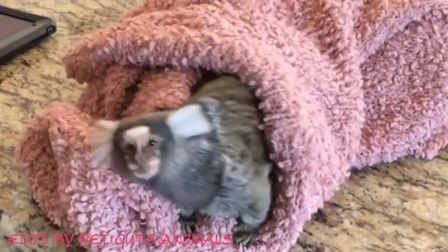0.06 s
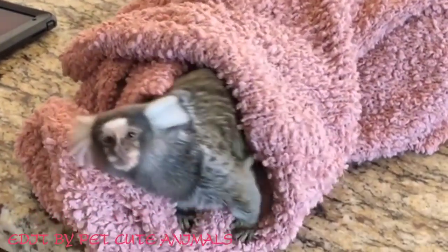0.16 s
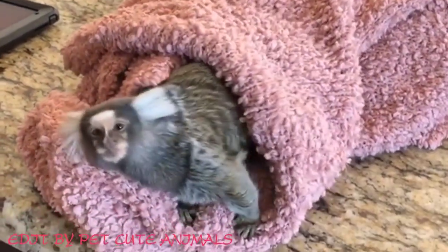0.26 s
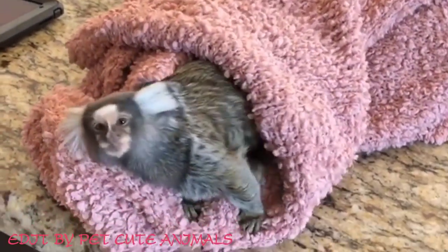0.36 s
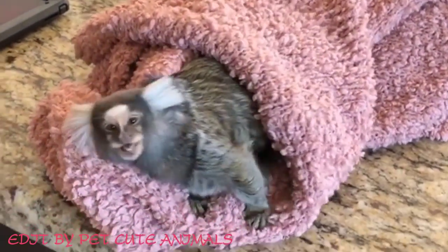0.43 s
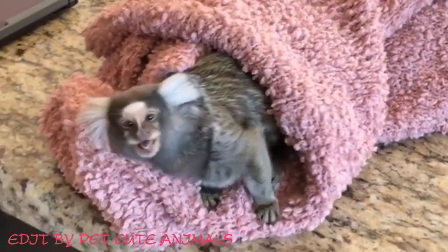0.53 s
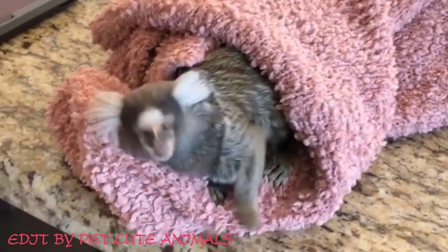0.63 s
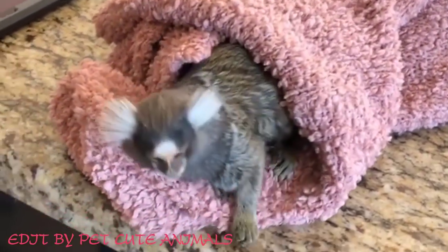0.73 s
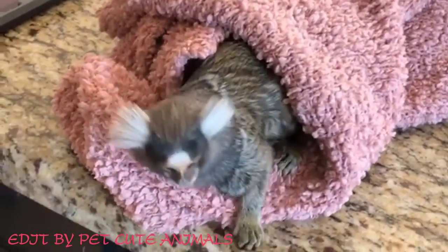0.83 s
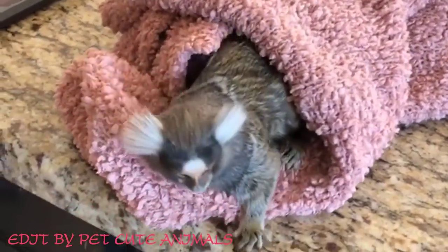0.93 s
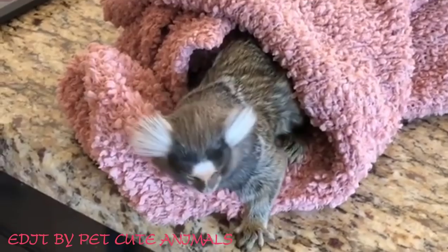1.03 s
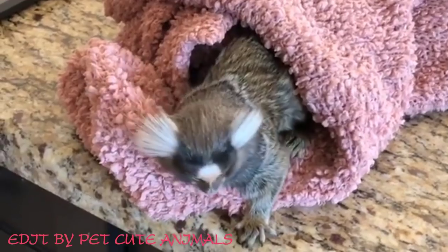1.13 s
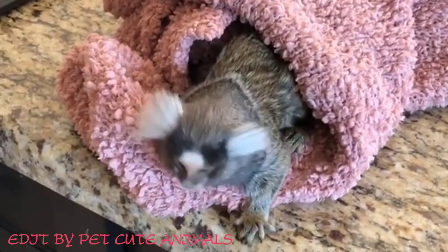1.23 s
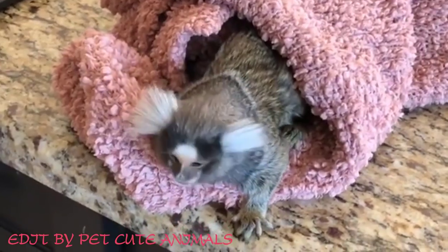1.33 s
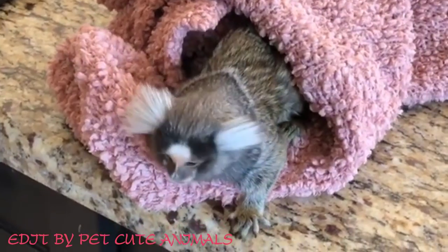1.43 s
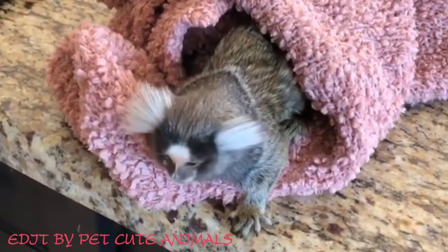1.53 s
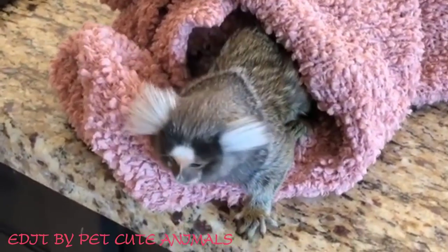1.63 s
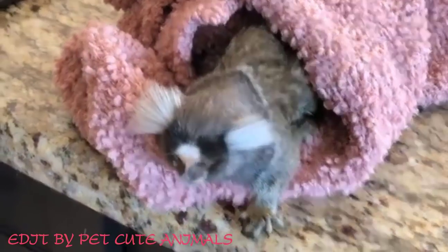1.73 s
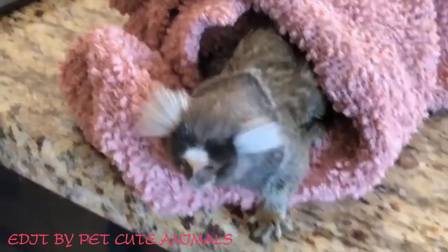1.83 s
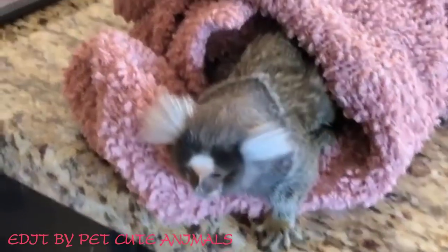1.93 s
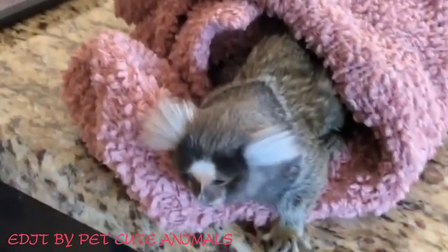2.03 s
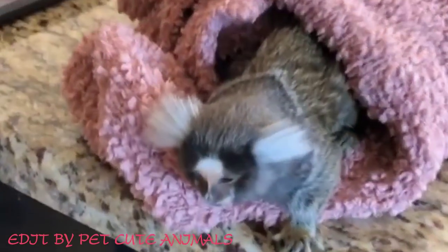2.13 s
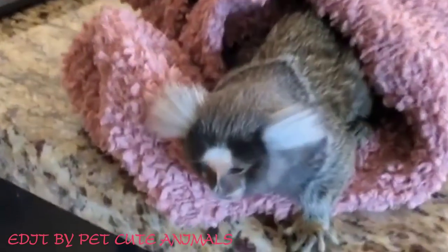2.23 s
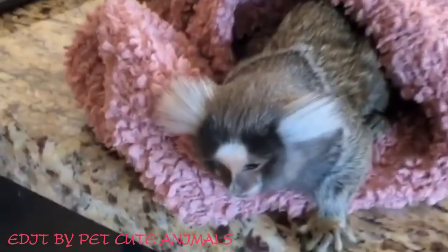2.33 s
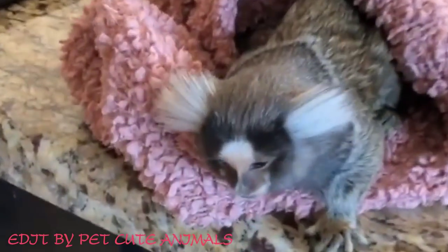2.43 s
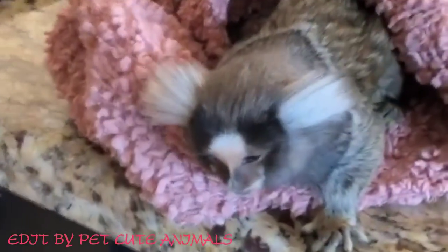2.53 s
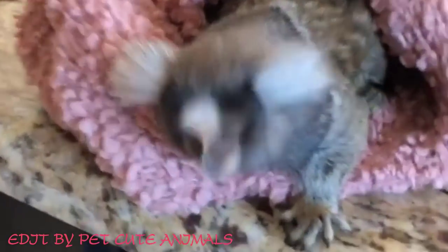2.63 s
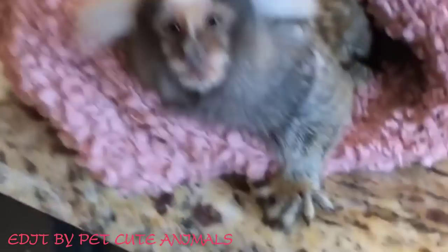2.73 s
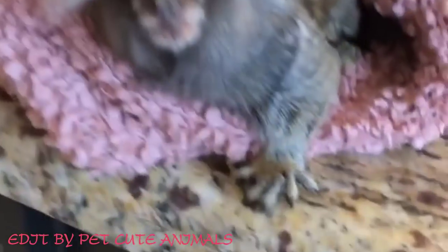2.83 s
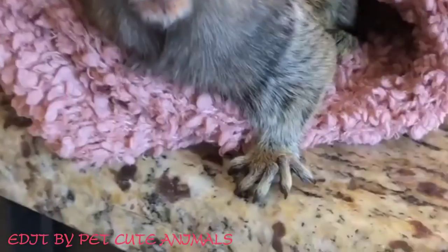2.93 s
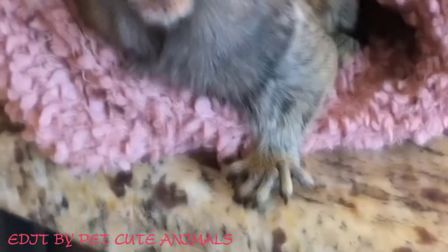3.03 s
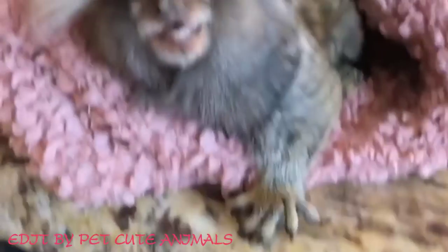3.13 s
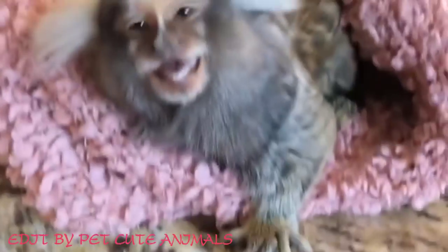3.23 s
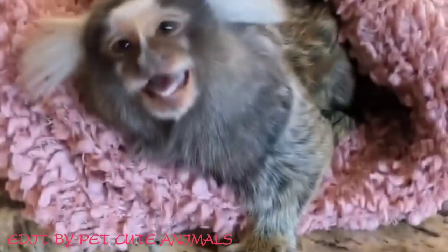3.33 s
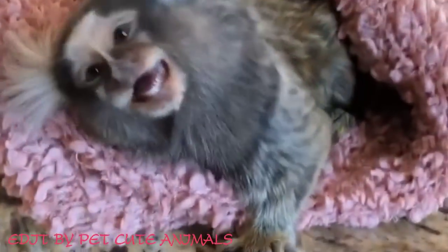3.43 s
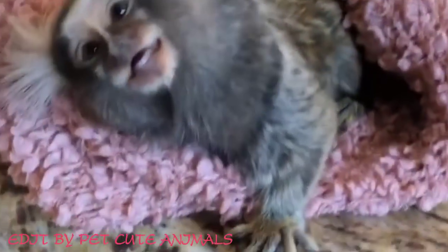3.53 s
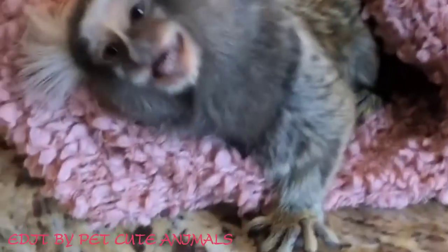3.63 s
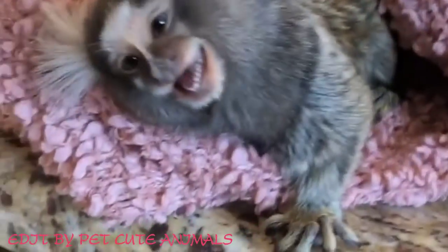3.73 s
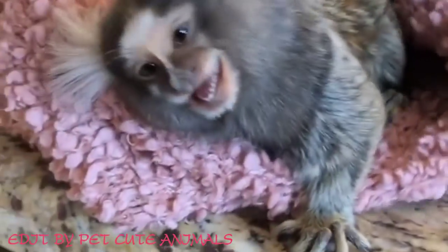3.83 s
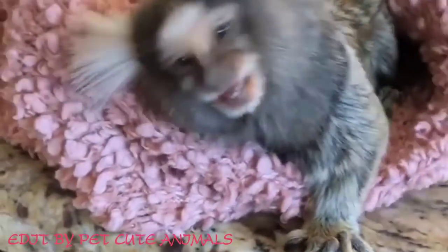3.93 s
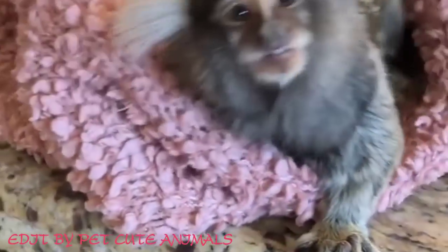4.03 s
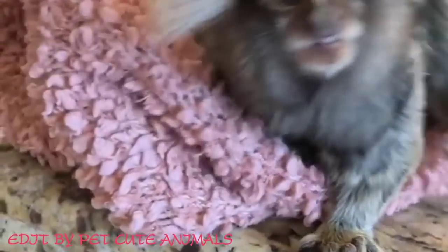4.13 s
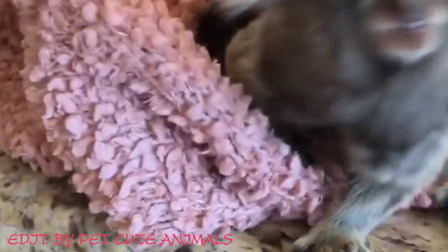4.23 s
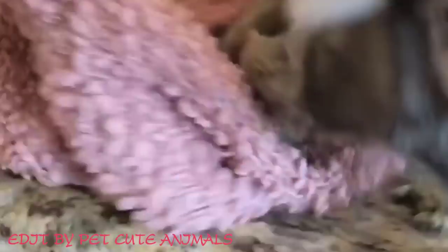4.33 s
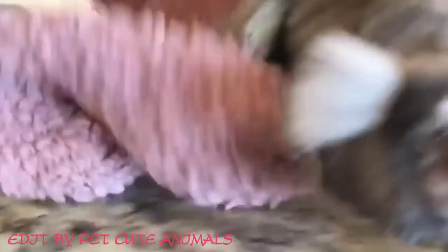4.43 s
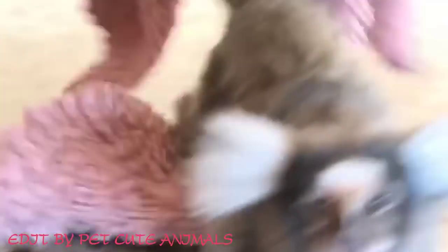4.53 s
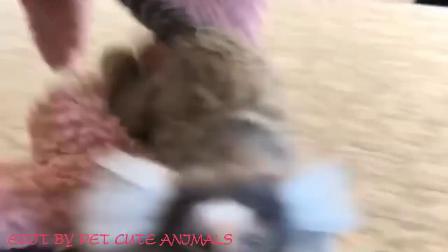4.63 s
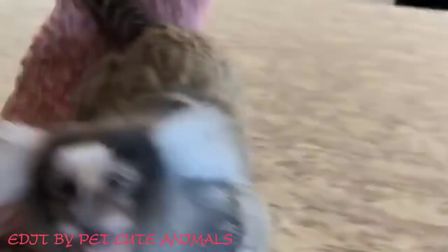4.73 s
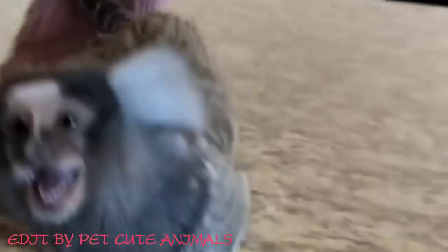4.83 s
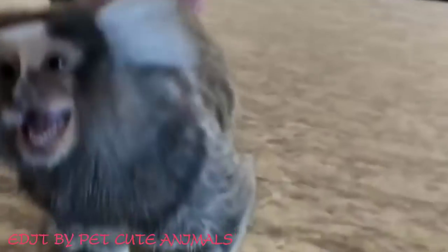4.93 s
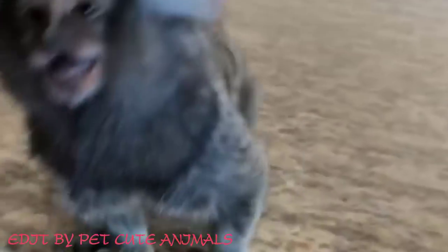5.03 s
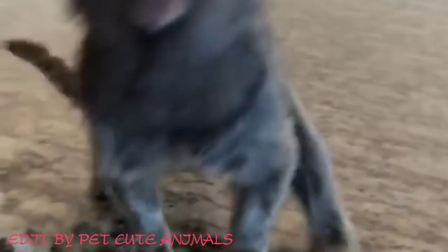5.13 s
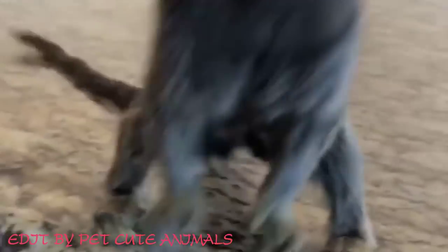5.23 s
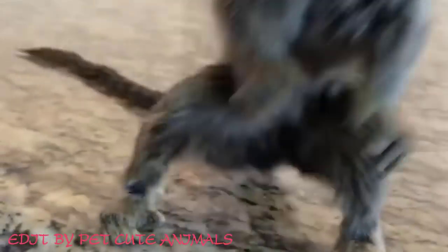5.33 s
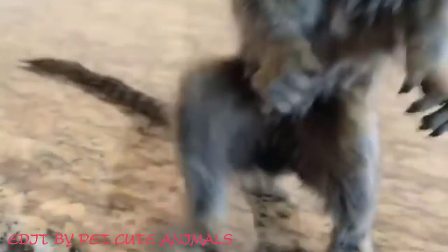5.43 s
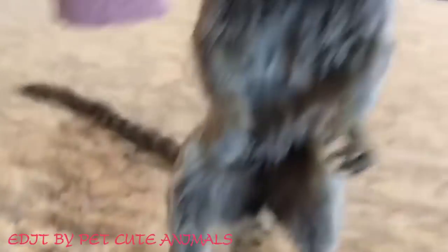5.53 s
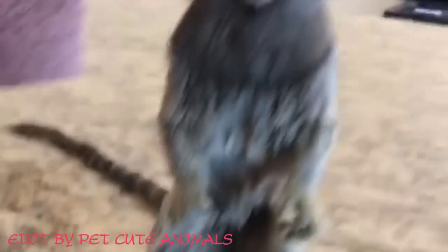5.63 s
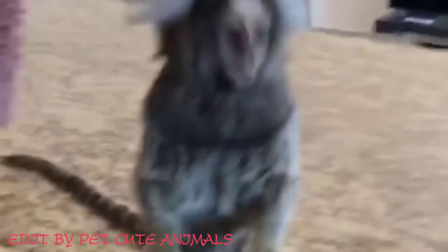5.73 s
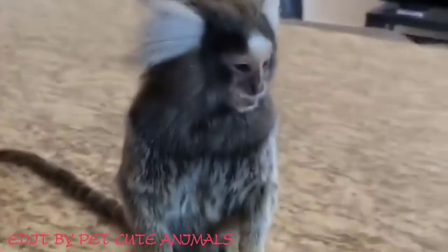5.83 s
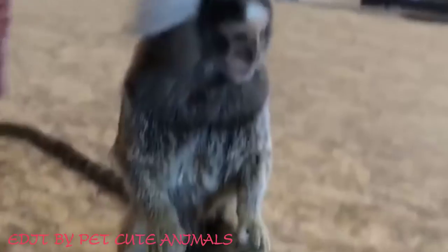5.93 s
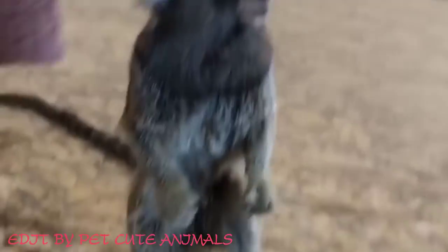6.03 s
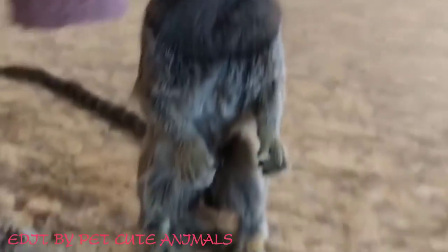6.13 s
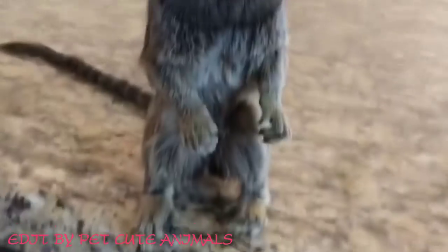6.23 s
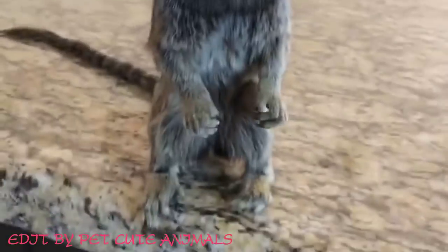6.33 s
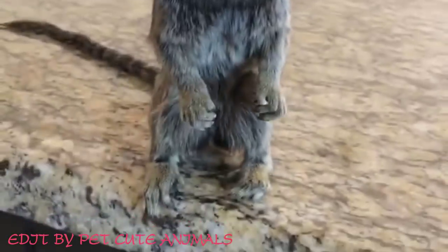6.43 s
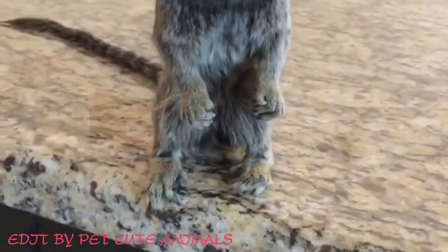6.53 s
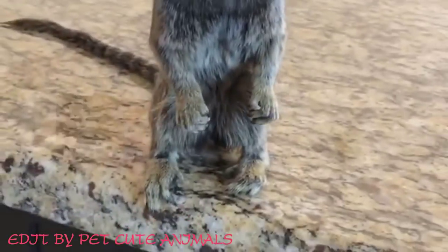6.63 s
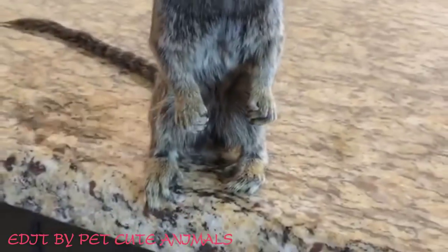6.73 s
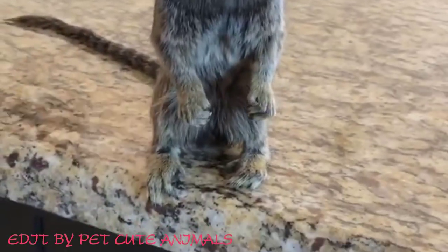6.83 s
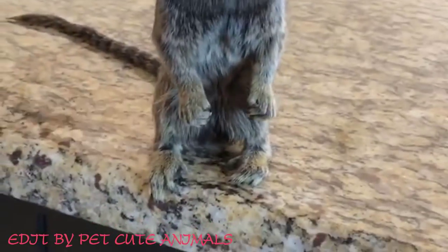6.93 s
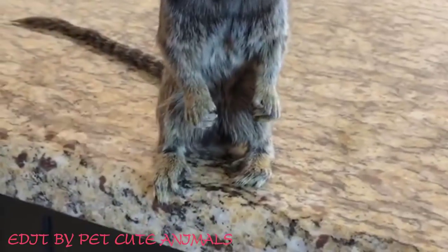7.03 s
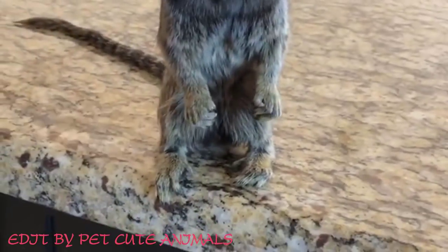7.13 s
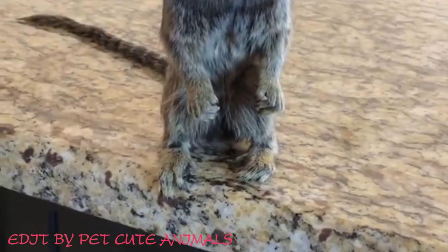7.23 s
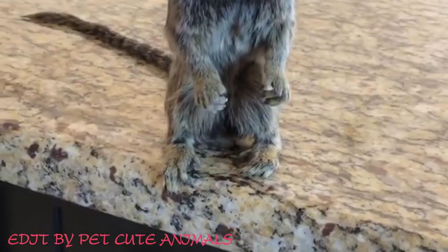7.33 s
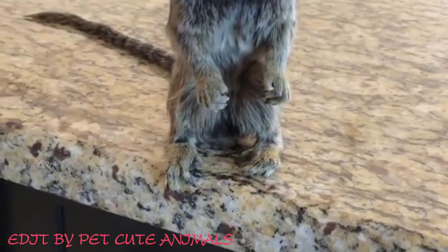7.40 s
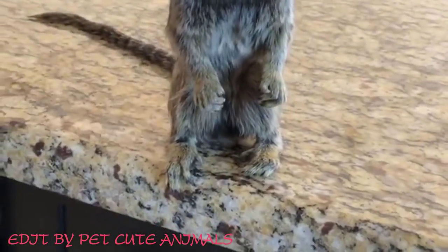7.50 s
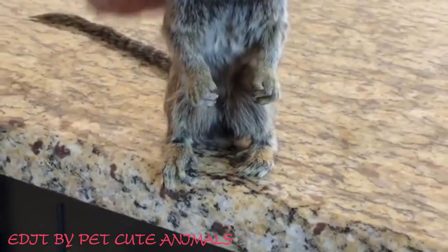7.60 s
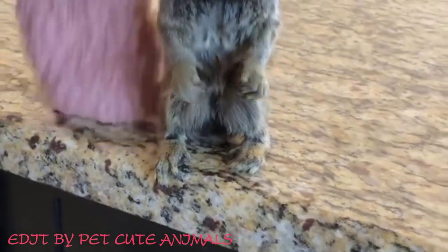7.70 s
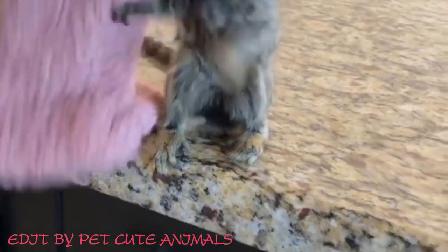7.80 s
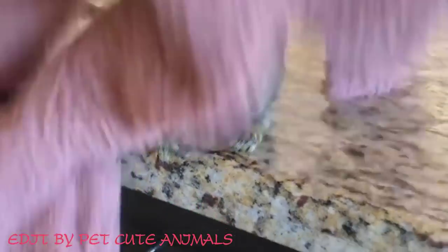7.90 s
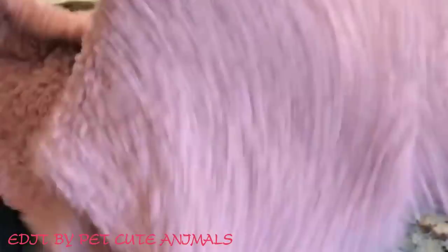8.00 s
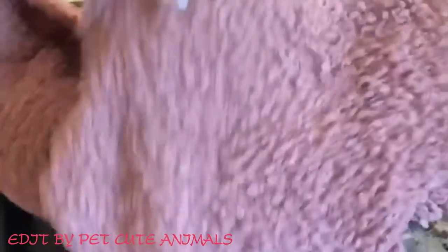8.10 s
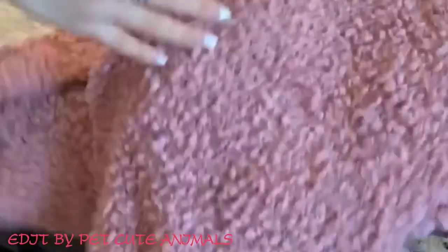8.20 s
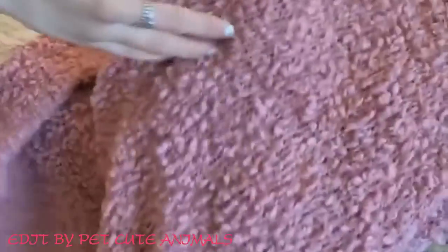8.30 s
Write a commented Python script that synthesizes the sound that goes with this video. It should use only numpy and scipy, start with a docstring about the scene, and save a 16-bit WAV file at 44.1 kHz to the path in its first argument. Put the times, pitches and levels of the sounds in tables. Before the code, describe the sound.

A small pet monkey gives seven harsh, raspy screams breaking into squeals, with high chirps, trills and faint blanket rustles in a quiet kitchen.

```python
"""An arching chirp leads into a marmoset's first rasping scream, then its blanket rustles on a stone counter.
A trill and two screams follow, then another trill, claw ticks, two more screams and two more trills.
After more rustling come the last two screams, a soft bump, more brushing and two final chirps.
Snaps of the vocal folds ring the throat for each scream; a whistle makes its final squeal and the other calls.
Shaped noise makes the brushing, ticks and air; an appliance hums and the kitchen rings faintly throughout."""
import sys
import numpy as np
from scipy import signal
from scipy.fft import rfft, irfft, next_fast_len
from scipy.io import wavfile
from scipy.ndimage import uniform_filter1d, map_coordinates

SR = 44100
rng = np.random.default_rng(int(sys.argv[2]) if len(sys.argv) > 2 else 0)


def log_audio(samples):
    """Write samples as a 16-bit WAV file to the path given in sys.argv[1]."""
    # one column per channel
    frames = np.atleast_2d(samples).T
    # limit to full scale, then quantise
    limited = np.clip(frames, -1, 1)
    pcm = np.round(limited * 32767).astype(np.int16)
    wavfile.write(sys.argv[1], SR, pcm)


N = 368676
TOP_HZ = 14100  # upper band limit

# Screams: (moment the folds go slack [s], rate before it [pulses/s], rate once recovered [pulses/s],
#   basic roughness [0-1], low resonance [dB], its drift [dB], treble against the main level at the start [dB],
#   the same at the end [dB], gape: stretch of the throat's resonances [factor])
SCREAM_CALLS = [(.33, 560, 470, 0.09, -48.5, -1.5, -10.5, -6, 1.007),
                (3.005, 604, 470, .16, -44, 0, -3.5, -7.5, 1.012),
                (3.414, 500, 553, 0.19, -40, -9.5, -8, -6.5, 1.016),
                (4.62, 607, 540, 0.16, -41.5, -4.5, -11, -8.5, 0.96),
                (5.072, 560, 505, 0.14, -43.5, -3.5, -12.5, 0, 1.007),
                (6.948, 620, 488, .05, -50.5, 1.5, -5, -1.5, 1.025),
                (7.432, 620, 470, 0.17, -51.5, 0.5, -9, -6.5, 0.97)]
# Effort through each scream, one list per scream: (time [s], level [dB])
SCREAM_EFFORTS = [
    [(0.255, -43.5), (0.261, -53), (0.289, -46), (0.295, -39.5), (0.313, -37), (0.327, -39.5), (0.397, -38)],
    [(2.895, -37), (2.907, -23.5), (2.927, -39), (2.957, -25.5), (3.023, -36.5), (3.045, -30.5),
     (3.091, -33.5), (3.121, -29), (3.195, -30.5)],
    [(3.385, -43), (3.399, -27.5), (3.431, -28), (3.479, -36.5), (3.487, -24), (3.499, -20.5), (3.519, -34),
     (3.575, -25.5), (3.642, -32.5)],
    [(4.433, -48.5), (4.473, -21), (4.497, -33), (4.553, -24), (4.561, -30.5), (4.609, -28), (4.627, -36.5),
     (4.641, -31.5), (4.697, -32)],
    [(4.93, -33), (4.934, -36), (4.958, -24), (5.016, -32.5), (5.026, -29), (5.046, -36.5), (5.114, -34),
     (5.132, -29), (5.202, -33.5)],
    [(6.865, -53), (6.877, -62), (6.889, -38.5), (6.913, -31.5), (6.957, -41), (7.023, -34), (7.069, -35),
     (7.109, -33.5)],
    [(7.312, -52), (7.33, -34.5), (7.354, -28.5), (7.398, -30), (7.424, -34), (7.481, -37.5)],
]
# Fits in which the folds beat chaotically: (time [s], length [s], added roughness [0-1])
CHAOTIC_FITS = [(.255, .035, 0.52), (2.891, .125, .62), (3.379, .02, 0.53), (3.482, .024, .46),
                (3.566, .045, .12), (4.489, .035, 0.75), (4.553, .06, 0.68), (4.99, .09, .5),
                (6.926, .028, 0.76), (7.31, .036, 0.54), (7.405, .024, 0.47)]
# The squeal each scream breaks into: (length [s], start pitch [Hz], end pitch [Hz],
#   bow of the fall [power, over 1 flattens out], level [dB], change over the call [dB], octave [dB], rasp [dB])
SQUEAL_CALLS = [(.014, 6700, 6230, 1.4, -24.5, -1, -26.5, -32.5),
                (0.034, 6680, 6310, .65, -12.5, -10.5, -20, -27),
                (.044, 6100, 5570, 3.08, -37, 0, -24, -25),
                (.072, 6380, 5680, 3.7, -26, -2.5, -27.5, -22.5),
                (.037, 6120, 5690, 2.5, -26.5, -4.5, -20.5, -27),
                (.045, 6300, 5630, 3.37, -28.5, -8.5, -26.5, -29.5),
                (0.016, 5700, 5430, 1, -45, 7.5, -32, -31.5)]
# Short gliding peeps: (time [s], length [s], start pitch [Hz], end pitch [Hz], level [dB], change over the call [dB])
PEEP_CALLS = [(2.873, 0.034, 6100, 4300, -32.5, -14.5), (3.382, 0.009, 2380, 2480, -44.5, 9),
              (4.421, 0.025, 4160, 4380, -38, -2.5), (4.92, .011, 2870, 3160, -44.5, 7.5),
              (4.923, 0.0074, 5970, 6900, -32.5, 0), (6.858, .024, 2520, 3500, -49.5, -9),
              (6.867, 0.058, 946, 1510, -54, -8), (7.309, 0.032, 2750, 3670, -47.5, -8)]
# Chirps that climb, then mostly plunge; one keeps rising: (time [s], length of the climb [s],
#   length of the second part [s], start pitch [Hz], turning pitch [Hz], end pitch [Hz], bow of the second part [power],
#   level at the start [dB], at the turn [dB], midway through the second part [dB], at the end [dB])
CHIRP_CALLS = [(.204, .007, .043, 8800, 9770, 6050, 1.7, -52.5, -51, -45.5, -42.5),
               (5.483, .026, .012, 9060, 10280, 9200, 1.3, -25.5, -39, -47, -47),
               (6.719, 0.041, 0.029, 9720, 11630, 5150, 1.66, -47, -41.5, -33.5, -45.5),
               (8.239, 0.0086, .01, 6550, 9000, 10050, 1.1, -51.5, -61, -66, -68),
               (8.29, .032, .024, 10100, 11400, 6950, 1.2, -74, -64, -66, -59)]
# Warbling trills: (time [s], length [s], start pitch [Hz], end pitch [Hz], scoop from below [Hz], level [dB],
#   change over the call [dB], attack [s], final swing [Hz, negative dips first],
#   warble rate at the start [per s], at the end [per s])
TRILL_CALLS = [(2.334, 0.2, 10620, 8530, -2.5, -40, -8.5, .003, 400, 26.8, 27.2),
               (3.917, 0.18, 10380, 9050, 1898, -40.5, 0.5, 0.0072, 482, 38.4, 26.7),
               (5.386, 0.07, 8260, 8460, 2149, -8.5, -22.5, 0.024, 278.5, 47.4, 52.2),
               (5.555, .103, 9330, 8430, 0, -37.5, -4.5, .005, -300, 27.2, 27)]
# Resonances of the throat and open mouth: (frequency [Hz], gain [dB])
THROAT_GAIN = [(250, -29.5), (900, -30), (1450, -25.5), (1900, -16.5), (2250, -16), (2700, -16.5),
               (3500, -30), (4950, -26), (5700, -15), (6800, -2), (7800, -4.5), (9200, -14.5), (10800, -11),
               (12800, -13.5), (14000, -20)]
# Colour of the breath noise that fills the throat's hollow: (frequency [Hz], gain [dB])
HISS_COLOUR = [(1000, -40.5), (2800, -4), (3500, -1.5), (4700, -2.5), (5800, -1), (6800, -14.5),
               (9000, -50)]
# Fur and blanket brushing: (time of the middle [s], half length [s], level [dB])
BRUSHINGS = [(1.017, 0.075, -73), (1.975, 0.055, -70), (2.42, 0.15, -69.5), (2.702, 0.31, -66.5),
             (4.086, 0.1, -64), (4.251, 0.21, -67), (5.704, 0.018, -62.5), (5.86, 0.026, -67.5),
             (6.107, 0.032, -61.5), (6.25, 0.09, -73), (6.655, 0.048, -68), (7.745, 0.091, -62.5),
             (7.845, .012, -65), (7.922, 0.09, -63), (8.219, 0.18, -71.5)]
# Claws ticking on stone: (time [s], level before it dies away [dB])
CLAW_TICKS = [(1.939, -59), (2.452, -52), (4.065, -50), (4.136, -41.5), (7.838, -67), (7.85, -68)]
# Soft bumps on the counter: (time [s], level before the soft attack and decay [dB])
COUNTER_BUMPS = [(7.762, -39.5)]
# Colours of brushed fibres, of a claw tick and of a bump: (frequency [Hz], gain [dB])
FIBRE_COLOUR = [(200, -10.0), (1000, 1.5), (4500, 0), (8000, -4), (14000, -11)]
TICK_COLOUR = [(800, -20.5), (4000, -8), (10000, -3), (14000, -3)]
BUMP_COLOUR = [(25, -30), (45, -8), (65, 8.5), (200, -16), (1500, -14), (4000, -46)]
# Faint thin chirps and squeaks: (time [s], length [s], start pitch [Hz], end pitch [Hz], level [dB])
BACKGROUND_CHIRPS = [(.54, 0.36, 3186, 3230, -76), (1.928, 0.022, 4450, 4250, -62.5),
                     (1.935, 0.056, 3470, 3400, -71), (6.1, 0.23, 2720, 2340, -72),
                     (7.835, 0.0365, 2170, 2335, -58), (7.84, .03, 4400, 4630, -64)]
# How long the kitchen rings: (frequency [Hz], time to die by 60 dB [s])
RING_TIMES = [(300, 0.55), (3000, 1), (6300, 0.53), (8500, .42), (13000, 0.34)]
# Share of the kitchen's answer, lower when the microphone is closer: (time [s], level [dB])
KITCHEN_SHARE = [(.6, -12.5), (3.0, -19), (4.8, -19), (7.0, -14)]
# Appliance hum: (frequency [Hz], level [dB], width [Hz])
HUM_TONES = [(59, -71.5, 7), (84, -62, 5.7), (168.2, -59, 13), (206, -68.5, 6), (396.6, -71, 1.2)]
# Colour of the room's air: (frequency [Hz], density [dB per Hz])
AIR_COLOUR = [(15, -66.5), (25, -38), (37, -23.5), (70, -10.5), (133, -8), (164, -6), (257, -10.5),
              (403, -13.5), (511, -20.5), (569, -14), (781, -19), (1260, -23), (1470, -30), (4600, -38),
              (14000, -50.5)]

SLACK_RATE = 365  # pulses/s at the slackest, before the tension near each end is added
SLACKEN_S, RECOVER_S = .022, .033  # time to sink to the slack rate and to recover
TENSE_START, TENSE_END, TENSE_S = .22, 0.15, .018  # shares by which the ends of a scream are faster, and their time
LOW_ATTACK_DB, LOW_ATTACK_S = 5, 0.0088  # the low resonance builds up from this far below, in about this time
LOW_LEAD_DB = -1.5  # highest low resonance against the main level
HISS_DB = -13.5  # air of a fully rough voice against its level
BREAK_S = .005  # the voice breaks this long after the scream's last effort
RASP_RATE, RASP_ROUGH, RASP_FADE_DB = 860, .35, 21  # folds under a squeal: pulses/s, roughness 0-1, fade
RASP_LOW_DB, RASP_TREBLE_DB = -21, -13  # that rasp's low and treble parts against its main level
FLUTTER_DIES = 1.2  # power curve of the dying flutter
OCTAVE_ARCH_DB = 7.5  # a squeal's octave is this much weaker at both ends
SCOOP_S, SWING_GROWS = 0.013, 0.4  # trill: time of the scoop; power of time by which the swing widens
AIR_DB = -55.5


def marmoset():
    """The voice: every scream breaks into a squeal; peeps, chirps and trills come before and between."""
    out = np.zeros(N)
    for effort, (*folds, gape), (length, *tone, rasp_db) in zip(SCREAM_EFFORTS, SCREAM_CALLS, SQUEAL_CALLS):
        add(out, effort[0][0], scream(effort, *folds, gape))
        broken_voice = squeal(length, *tone) + dying_rasp(length, rasp_db, gape)
        add(out, effort[-1][0] + BREAK_S, broken_voice)
    for voice, calls in [(peep, PEEP_CALLS), (chirp, CHIRP_CALLS), (trill, TRILL_CALLS)]:
        for s, *shape in calls:
            add(out, s, voice(*shape))
    return out


def scream(effort, slack_s, early_rate, late_rate, rough, low_db, drift_db, treble_start_db, treble_end_db, gape):
    """The folds start tense, go slack, often after a chaotic fit, then recover and tighten towards the break."""
    times, levels = np.transpose(effort)
    t, u, gate = span(times[-1] + BREAK_S - times[0])
    s = times[0] + t
    db = np.interp(s, times, levels)

    sinking = early_rate + (SLACK_RATE - early_rate) * np.exp(-((s - slack_s) / SLACKEN_S) ** 2)
    recovering = late_rate + (SLACK_RATE - late_rate) * np.exp(-abs(s - slack_s) / RECOVER_S)
    tension = 1 + TENSE_START * np.exp(-t / TENSE_S) + TENSE_END * np.exp((t - t[-1]) / TENSE_S)
    rate = np.where(s < slack_s, sinking, recovering) * tension

    chaos = sum(more / (1 + (2 * (s - start) / length - 1) ** 8) for start, length, more in CHAOTIC_FITS)
    treble_db = db + treble_start_db + (treble_end_db - treble_start_db) * u
    low_build = low_db + drift_db * u - LOW_ATTACK_DB * np.exp(-t / LOW_ATTACK_S)
    low = np.minimum(low_build, db + LOW_LEAD_DB)
    return rasp(gate, rate, rough + chaos, db, low, treble_db, gape)


def rasp(gate, rate, rough, db, low_db, treble_db, gape, low_edge_hz=4100, high_edge_hz=9100):
    """Uneven fold pulses ring the throat; roughness adds air, least of all to the low resonance."""
    rough = rough.clip(0, 1)
    snaps, puffs = pulses(rate, rough, jitter=.022, rough_jitter=.22,
                          scatter_db=0.5, rough_scatter_db=1.16, puff_s=0.00049)
    grid = np.linspace(0, SR / 2, 512)

    def above(hz, edge):
        """A steep step up at an edge that moves with the gape."""
        return 1 / (1 + (edge * gape / (hz + 1)) ** 20)

    def throat(hz):
        """The throat's gain, stretched by the gape."""
        return amp(along(THROAT_GAIN, hz / gape))

    def resonance(region, airy):
        """One region of the throat near rms 1, with this share of air."""
        airy = np.clip(airy, 0, 1)
        source = gate * (np.sqrt(1 - airy) * snaps + np.sqrt(airy) * puffs)
        strength = np.sqrt(np.mean((region(grid) * throat(grid) * (grid < TOP_HZ)) ** 2))
        return filtered(ring(source, throat), region) / strength

    low = resonance(lambda hz: 1 - above(hz, low_edge_hz), .1 + .4 * rough ** 2)
    main = resonance(lambda hz: above(hz, low_edge_hz) - above(hz, high_edge_hz), .12 + .68 * rough)
    treble = resonance(lambda hz: above(hz, high_edge_hz), .22 + .65 * rough)
    breath = unit(filtered(puffs, lambda hz: amp(along(HISS_COLOUR, hz))))
    hiss = amp(HISS_DB) * gate * rough ** 2 * breath
    voice = amp(low_db) * low + amp(db) * (main + hiss) + amp(treble_db) * treble
    return patchy(voice, depth_db=2.6)  # the strained colour never holds still


def pulses(rate, rough, jitter, rough_jitter, scatter_db, rough_scatter_db, puff_s):
    """Snaps of the vocal folds and the puff of air after each, both near rms 1."""
    n = len(rate)
    uneven = np.exp((jitter + rough_jitter * rough) * wobble(500, n))
    cycles = np.cumsum(rate * uneven) / SR
    at = np.interp(np.arange(.5, cycles[-1]), cycles, np.arange(n))  # one snap in each cycle
    i = at.astype(int)
    scatter = (scatter_db + rough_scatter_db * rough[i]) * rng.standard_normal(len(i)).clip(-2, 2)
    size = unit(amp(scatter)) * np.sqrt(SR / rate[i])

    # a windowed sinc places each snap between samples
    taps = i[:, None] + np.arange(-7, 9)
    offset = taps - at[:, None]
    shape = np.sinc(offset) * np.cos(np.pi * offset / 16) ** 2
    snaps = np.bincount(taps.clip(0, n - 1).ravel(), (size[:, None] * shape).ravel(), n)

    keep = np.exp(-1 / (puff_s * SR))
    flow = signal.lfilter([1 - keep], [1, -keep], np.bincount(i, size ** 2, n))
    return snaps, np.sqrt(flow) * rng.standard_normal(n)


def patchy(x, depth_db, size=256):
    """Patches of random gain, some hundred Hz wide and a few hundredths of a second long."""
    z = signal.stft(x, nperseg=size)[2]
    across_pitch = uniform_filter1d(rng.standard_normal(z.shape), size=4, axis=0)
    field = uniform_filter1d(across_pitch, size=10, axis=1)
    return signal.istft(z * unit(amp(depth_db * unit(field))), nperseg=size)[1][:len(x)]


def squeal(length, start_hz, end_hz, bow, db, fade_db, octave_db,
           flutter_hz=880, flutter_depth=1.0, unsteady=0.02, swell=1.2, bend=.45):
    """A falling whistle takes over while the folds flutter: each beat swells and bends it, adding sidebands."""
    t, u, gate = span(length)
    hz = end_hz + (start_hz - end_hz) * (1 - u) ** bow
    flutter = flutter_depth * (1 - u ** FLUTTER_DIES)
    # the beat slows as the pitch falls
    beat = phase(flutter_hz * hz / hz.mean() * (1 + .04 * wobble(297, len(t))))
    unsteady_hz = hz * (1 + unsteady * flutter ** 1.4 * wobble(1200, len(t)))
    turn = phase(unsteady_hz) + bend * flutter * np.sin(beat)

    # the throat's gain is taken off first, because ring() puts it back
    first = amp(db + fade_db * u - along(THROAT_GAIN, hz)) * np.sin(turn)
    octave_level = octave_db - OCTAVE_ARCH_DB * (2 * u - 1) ** 2
    second = amp(octave_level - along(THROAT_GAIN, 2 * hz)) * np.sin(2 * turn)
    swelling = np.exp(swell * flutter * np.cos(beat))
    return ring(gate * swelling * (first + second), lambda f: amp(along(THROAT_GAIN, f)))


def dying_rasp(length, db, gape):
    """At the break the folds jump to a fast beat that fades under the squeal."""
    t, u, gate = span(length)
    db = db - RASP_FADE_DB * u ** 2
    rate, rough = np.full(len(t), RASP_RATE), np.full(len(t), RASP_ROUGH)
    return rasp(gate, rate, rough, db, db + RASP_LOW_DB, db + RASP_TREBLE_DB, gape)


def peep(length, start_hz, end_hz, db, fade_db, rough=0.016):
    """One short, slightly hoarse glide of the whistle."""
    t, u, gate = span(length)
    hz = start_hz * (end_hz / start_hz) ** u * (1 + rough * wobble(900, len(t)))
    return gate * whistle(hz, db + fade_db * u, overtones_db=(0, -13, -11))


def chirp(climb_s, second_s, start_hz, turn_hz, end_hz, bow, *levels_db, round_s=.005):
    """The whistle climbs ever faster to a rounded turning pitch, then bows towards its end pitch."""
    t, u, gate = span(climb_s + second_s)
    left = np.clip((climb_s + second_s - t) / second_s, 0, 1)
    climb = start_hz + (turn_hz - start_hz) * (t / climb_s) ** 3
    second_part = end_hz + (turn_hz - end_hz) * left ** bow
    hz = np.where(t < climb_s, climb, second_part)
    db = np.interp(t, [0, climb_s, climb_s + second_s / 2, climb_s + second_s], levels_db)
    return gate * whistle(uniform_filter1d(hz, size=round(round_s * SR)), db)


def trill(length, start_hz, end_hz, scoop_hz, db, fade_db, attack, swing_hz, start_rate, end_rate):
    """The whistle scoops to a gliding centre pitch and swings ever wider about it."""
    t, u, gate = span(length)
    warble = swing_hz * u ** SWING_GROWS * np.cos(phase(start_rate + (end_rate - start_rate) * u))
    hz = start_hz + (end_hz - start_hz) * u - scoop_hz * np.exp(-t / SCOOP_S) + warble
    return gate * np.clip(t / attack, 0, 1) ** 0.77 * whistle(hz, db + fade_db * u)


def whistle(hz, db, overtones_db=(0, -17, -19)):
    """An almost pure, slightly unsteady tone with weak overtones."""
    n = len(hz)
    turn = phase(hz * (1 + 0.0032 * wobble(600, n)))
    tone = 0
    for k, level in enumerate(overtones_db, 1):
        too_high = (k * hz / (.4 * SR)) ** 30  # removes overtones near the top of the digital range
        tone = tone + amp(level) * np.sin(k * turn) / (1 + too_high)
    return np.sqrt(2) * amp(db + 0.37 * wobble(130, n)) * tone


def movements():
    """Grainy brushing of cloth and fur, claw ticks and a dull bump, all from shaped noise."""
    t = np.arange(N) / SR
    stroke = np.sqrt(sum(amp(db) ** 2 * np.exp(-((t - s) / half) ** 2) for s, half, db in BRUSHINGS))
    fibres = noise(FIBRE_COLOUR, N)
    out = stroke * unit(fibres * amp(2.4 * wobble(280, N)))

    t = t[:SR // 4]
    for s, db in CLAW_TICKS:
        add(out, s, amp(db - 60 * t / 0.02) * noise(TICK_COLOUR, len(t)))
    for s, db in COUNTER_BUMPS:
        soft_attack = 1 - np.exp(-t / 0.0041)
        add(out, s, amp(db - 60 * t / 0.087) * soft_attack * noise(BUMP_COLOUR, len(t)))
    return out


def faint_chirps():
    """Small whistled glides that swell and fade."""
    out = np.zeros(N)
    for s, length, start_hz, end_hz, db in BACKGROUND_CHIRPS:
        n = round(length * SR)
        hz = np.linspace(start_hz, end_hz, n) * (1 + 0.014 * wobble(202, n))
        add(out, s, np.hanning(n) ** .5 * whistle(hz, db))
    return out


def kitchen(x):
    """The walls' diffuse answer, each frequency dying at its own speed."""
    hz, t, z = signal.stft(rng.standard_normal(SR), SR, nperseg=256)
    decay = amp(-60 * t / along(RING_TIMES, hz)[:, None])
    tail = signal.istft(z * decay, SR, nperseg=256)[1]
    tail = np.pad(tail / np.linalg.norm(tail), (round(.006 * SR), 0))  # it arrives 6 ms late
    return signal.fftconvolve(x, tail)[:N]


def room_tone():
    """Moving air as coloured noise, and the wavering tones of an appliance's hum."""
    t = np.arange(N) / SR
    hum = 0
    for hz, db, width in HUM_TONES:
        waver = 1 + 0.92 * wobble(2 * width, N) + .6j * wobble(2 * width, N)
        hum = hum + amp(db) * unit(np.real(waver * np.exp(2j * np.pi * hz * t)))
    return hum + amp(AIR_DB) * noise(AIR_COLOUR, N)


def noise(spectrum, size):
    """Coloured noise of rms 1."""
    return unit(filtered(rng.standard_normal(size), lambda hz: amp(along(spectrum, hz))))


def span(length, edge_s=.002):
    """A call's own time, its progress 0-1 and its soft on-off gate."""
    t = np.arange(0, length + edge_s, 1 / SR)
    edge = np.clip(np.minimum(t, t[-1] - t) / edge_s, 0, 1)
    return t, np.clip(t / length, 0, 1), np.sin(np.pi / 2 * edge) ** 2


def wobble(rate, size):
    """A smooth random curve, rate knots a second."""
    knots = rng.standard_normal(int(size * rate / SR) + 4)
    return map_coordinates(knots, [np.arange(size) * rate / SR])


def phase(hz):
    """The running angle of a tone whose pitch changes."""
    return 2 * np.pi * np.cumsum(hz) / SR


def ring(x, gain, size=1024):
    """x through the causal filter that has this gain of frequency."""
    cepstrum = irfft(np.log(np.maximum(gain(np.fft.rfftfreq(size, 1 / SR)), 1e-6)))
    # folding the cepstrum makes the filter react only after its input
    cepstrum[1:size // 2] *= 2
    cepstrum[size // 2 + 1:] = 0
    return signal.fftconvolve(x, irfft(np.exp(rfft(cepstrum))))[:len(x)]


def filtered(x, response):
    """x times a response of frequency."""
    m = next_fast_len(len(x) + SR // 8)
    return irfft(rfft(x, m) * response(np.fft.rfftfreq(m, 1 / SR)), m)[:len(x)]


def along(points, hz):
    """Reads a curve of (frequency [Hz], value) points on a log axis."""
    f, v = np.transpose(points)
    return np.interp(np.log(hz + 1), np.log(f + 1), v)


def amp(db):
    """Decibels to a plain factor."""
    return 10 ** (np.asarray(db) / 20)


def unit(x):
    """x scaled to rms 1."""
    return x / np.sqrt(np.mean(x ** 2) + 1e-20)


def add(track, s, sound):
    """Mixes a sound in at time s."""
    part = track[max(round(s * SR), 0):][:len(sound)]
    part += sound[:len(part)]


def scene():
    """The animal close by, the kitchen's answer and the room tone, the same in both channels."""
    near = marmoset() + movements() + faint_chirps()
    wet = amp(np.interp(np.arange(N) / SR, *np.transpose(KITCHEN_SHARE)))
    mono = near + kitchen(wet * near) + room_tone()
    return np.array([mono, mono])


def record(dry):
    """The recorder keeps nothing above its band limit, which is a slope 400 Hz wide."""
    def band(hz):
        """Gain that falls from 1 to 0 around the limit."""
        return np.clip((TOP_HZ - hz) / 400 + .5, 0, 1)

    return np.array([filtered(x, band) for x in dry])


dry = scene()
out = record(dry)
log_audio(out)
```